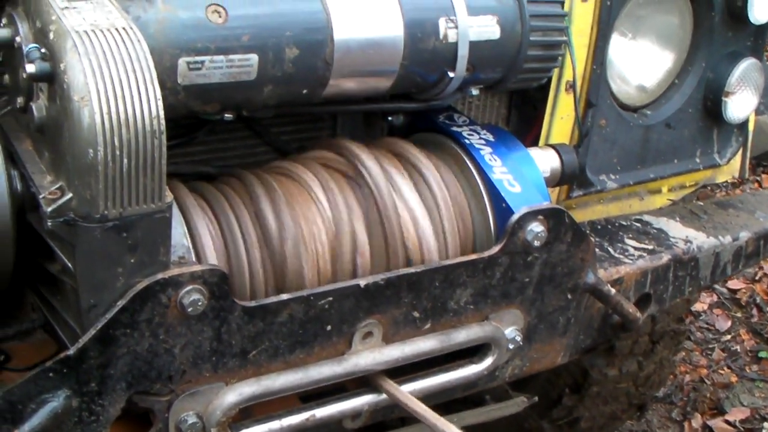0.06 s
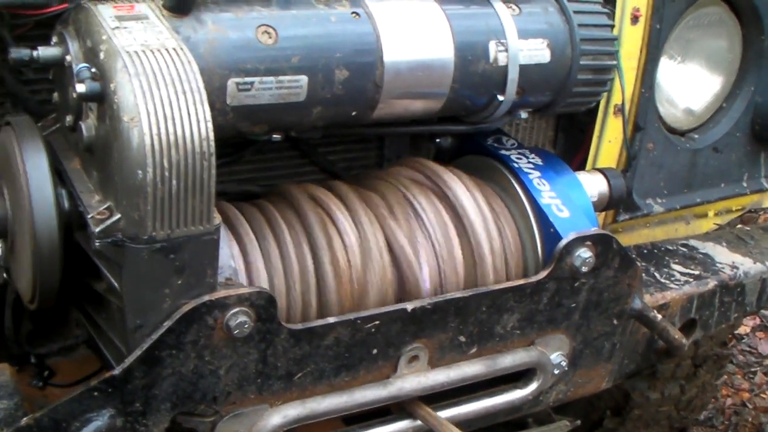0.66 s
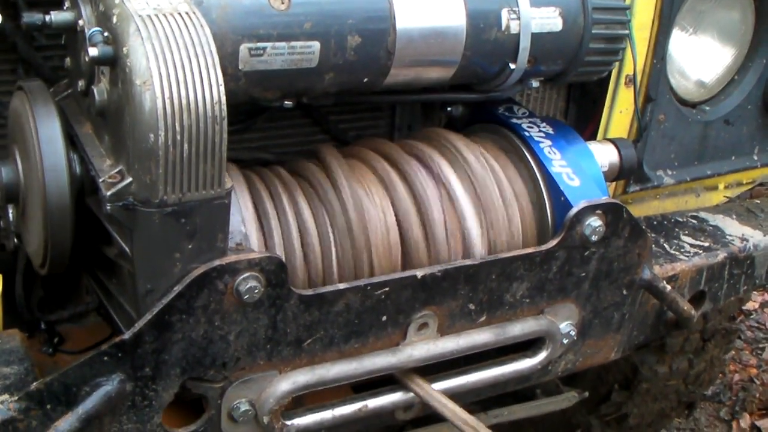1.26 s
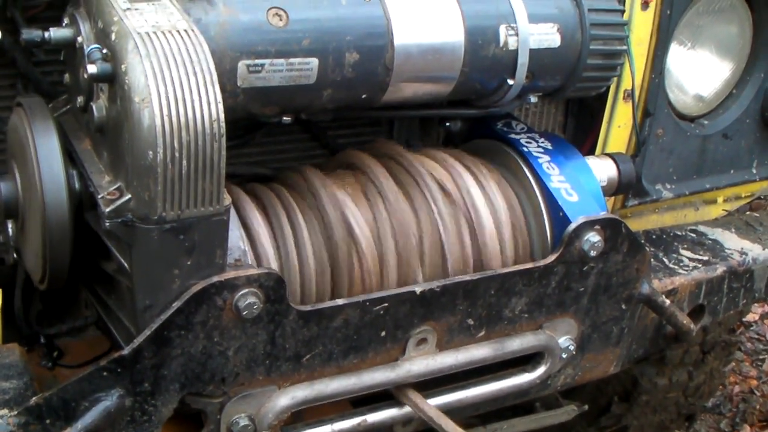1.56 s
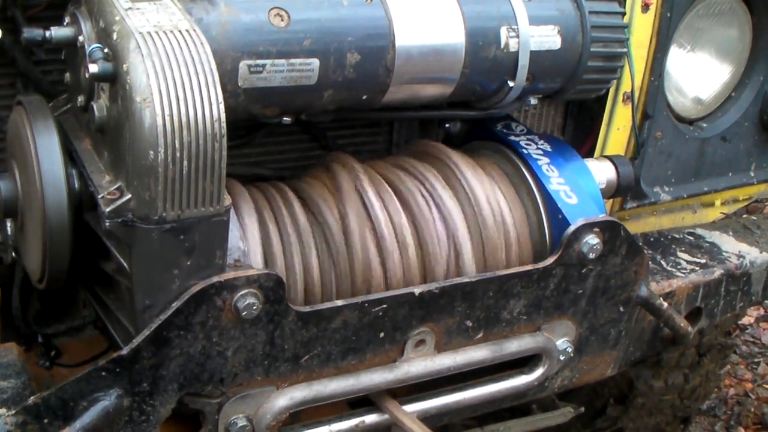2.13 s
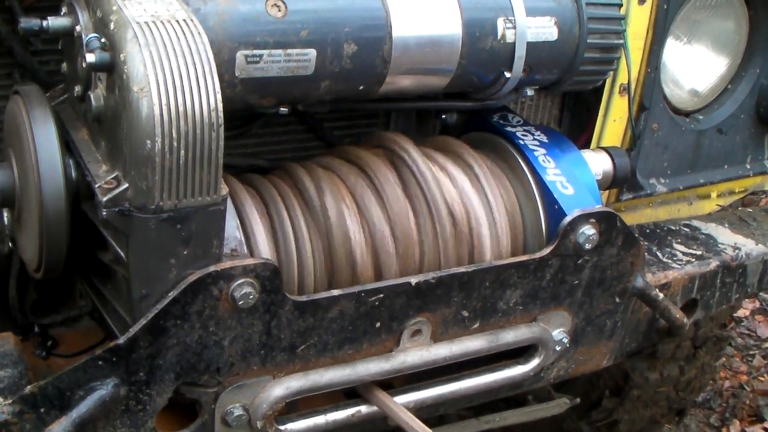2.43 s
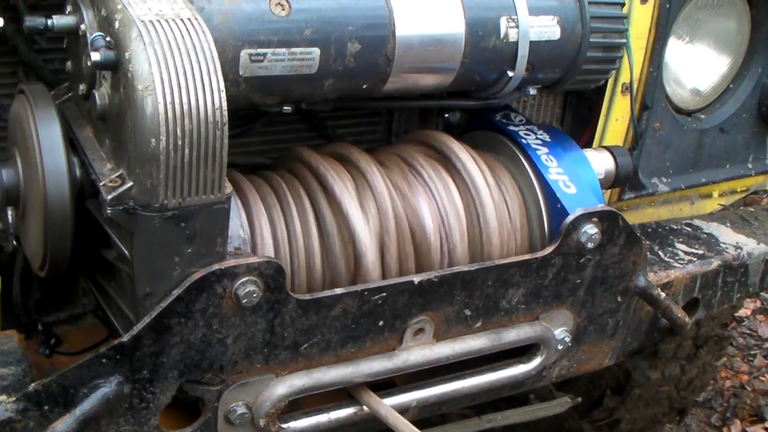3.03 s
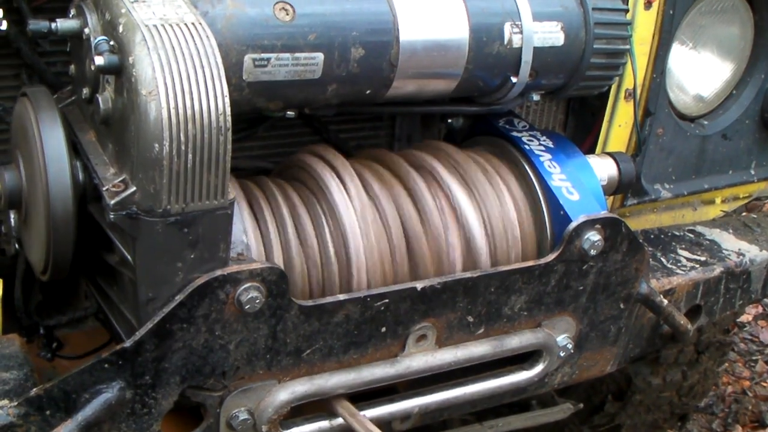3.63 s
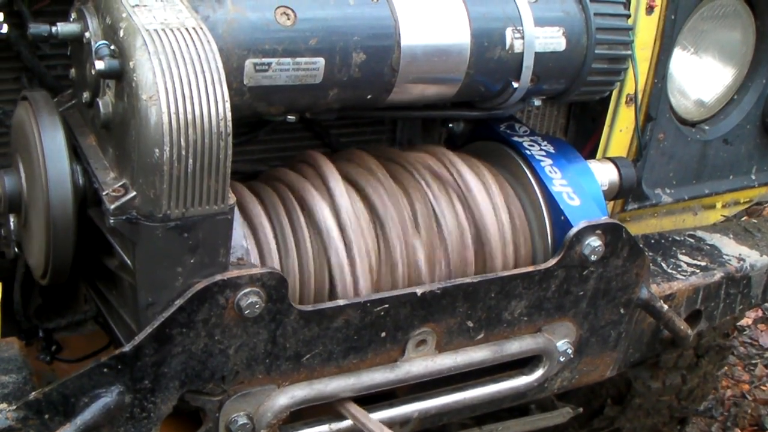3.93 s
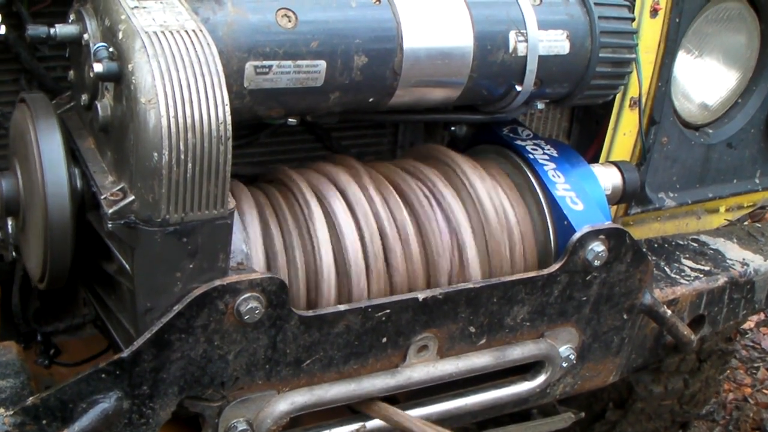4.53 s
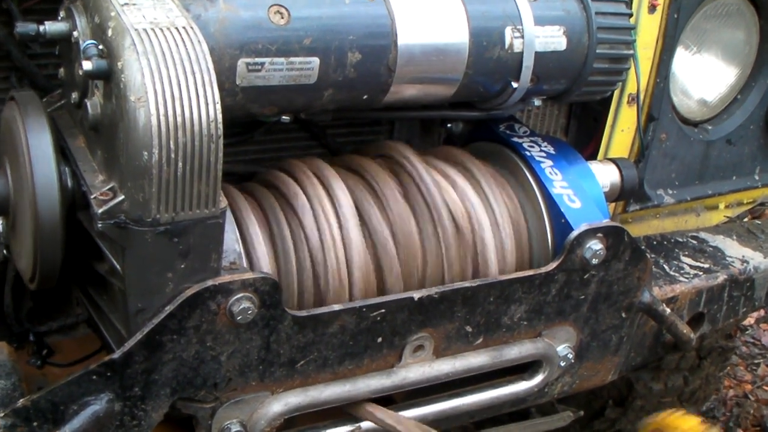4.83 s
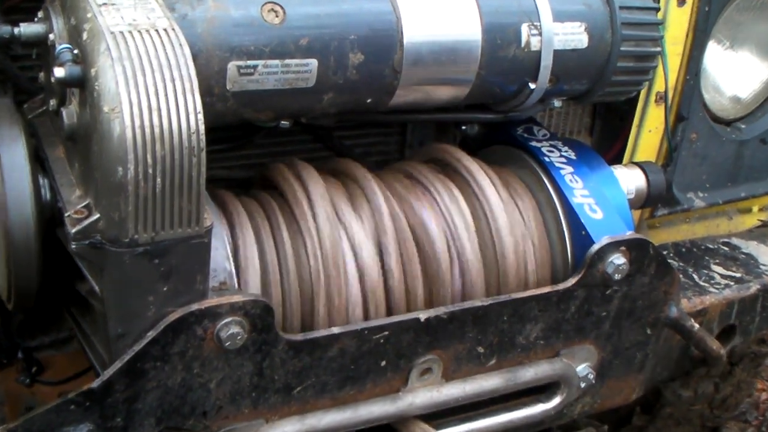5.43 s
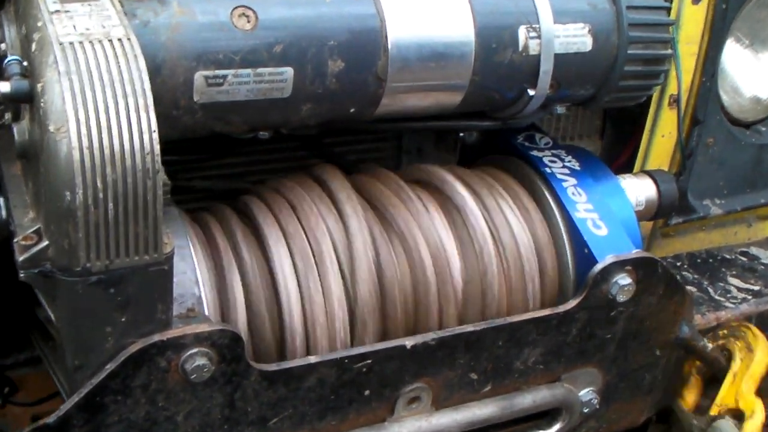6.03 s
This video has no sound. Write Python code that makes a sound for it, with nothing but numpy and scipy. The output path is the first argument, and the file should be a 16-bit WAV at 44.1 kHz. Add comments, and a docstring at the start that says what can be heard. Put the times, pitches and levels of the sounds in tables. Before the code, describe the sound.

An electric winch runs right by the microphone, its motor humming and whining over gritty whirring gears and a high hiss. A steel ratchet rattles along in very fast, uneven, ringing ticks. After about five seconds the motor starts to run down, its pitch sinking and whine fading. A hook clanks briefly against the bumper while the ticking carries on, more even and a little slower.

```python
"""Electric winch, close up

A winch winds in rope right by the microphone, then slows as the hook comes up and knocks on the bumper.
The motor hums and whines at multiples of its shaft speed, the gears whirr and the brushes hiss. A steel
pawl bounces unevenly over its ratchet, some sixty ringing ticks a second, falling into step as it slows.
"""
import sys
import numpy as np
from scipy.fft import rfft, irfft, next_fast_len
from scipy.io import wavfile
from scipy.ndimage import map_coordinates

SR = 44100
rng = np.random.default_rng(int(sys.argv[2]) if len(sys.argv) > 2 else 0)


def to_wav(sig):
    """Store sig (one row per channel, or 1-D mono) as 16-bit WAV at the path in sys.argv[1].

    Samples outside -1..1 are clipped; the rate is SR.
    """
    pcm = np.clip(np.atleast_2d(sig), -1, 1) * 32767
    pcm = np.round(pcm).astype(np.int16)
    wavfile.write(sys.argv[1], SR, pcm.T)  # frames by channels


N = 276507


def ratchet(speed, ring_gain_db=2.2, snap_gain_db=1, detune=0.0039, left_lead_s=0.000013):
    """Each drop snaps the pawl's tip and sets its close modes swelling and dying."""
    # Modes of the steel pawl and of its tip. Each row: frequency in Hz, level in dB, t60 in seconds.
    pawl_modes = [(4464, -2.5, 0.0097), (4727.7, 6, 0.016), (4796.4, 4.5, 0.023), (6460, -4, 0.0084),
                  (8745, -10.5, 0.014), (9740, -13, 0.019)]
    tip_modes = [(6980, -2.5, 0.0095), (12560, 1.5, 0.0046), (13540, 2.5, 0.013), (14150, 1.5, 0.0044)]
    times, ring_db, snap_db = pawl_drops(speed).T
    t = np.arange(SR // 40) / SR
    seat = 1 + detune * rng.standard_normal((len(times), 1))  # how the pawl sits shifts all its modes
    out = np.zeros((2, N))
    for k, (hz, db, t60) in enumerate(pawl_modes):
        size = (-1) ** k * amp(ring_db + ring_gain_db + db)[:, None]  # neighbours start in opposition
        out += placed(times, size * amp(-60 * t / t60) * np.sin(2 * np.pi * hz * seat * t))
    attack = 1 - np.exp(-t / 0.00021)
    for hz, db, t60 in tip_modes:  # the tip lands a little differently every time
        strength, phase, stray = rng.standard_normal((3, len(times), 1))
        envelope = attack * amp(snap_db[:, None] + snap_gain_db + db + 0.76 * strength - 60 * t / t60)
        tip_hz = hz * (1 + 0.012 * stray)
        for channel, lead in enumerate([left_lead_s, 0]):  # the left microphone is nearer
            snap = envelope * np.sin(2 * np.pi * tip_hz * (t + lead) + 1.36 * phase)
            out[channel] += placed(times, snap)
    return out * amp([[.25], [-.25]])


def pawl_drops(speed, teeth_per_turn=0.8054, ring_spread_db=3.0, snap_spread_db=4.0, calm=0.43):
    """Hard drops with lighter bounces between them, as rows of seconds, ring dB and snap dB."""
    # The pawl's hardest drops. Each row: time in seconds, ring in dB, snap in dB.
    hard_drops = np.array([(0.0069, -13.0, -16), (0.149, -9, -14), (0.276, -12.0, -16), (0.4035, -10, -16),
                           (0.4776, -16, -11.0), (0.5527, -10.0, -14.0), (0.5745, -11.5, -11),
                           (0.7475, -10.5, -13), (0.83, -10, -13), (0.9025, -13, -14),
                           (0.9492, -11.5, -14.0), (1.0374, -12.5, -10.0), (1.144, -12, -14),
                           (1.2027, -13.0, -10.0), (1.284, -15, -9), (1.3453, -9.5, -12.0),
                           (1.3894, -12.5, -12), (1.5097, -10.0, -13.0), (1.585, -11.0, -12),
                           (1.6877, -14.5, -7.5), (1.7485, -11.5, -12), (1.8692, -10.5, -15),
                           (1.996, -12.0, -12.0), (2.1382, -13.0, -13), (2.2648, -13.0, -11),
                           (2.3455, -15.0, -9), (2.4648, -16, -10), (2.5111, -9.5, -16.0),
                           (2.6973, -11.5, -12), (2.854, -10.0, -12), (2.8751, -16, -9),
                           (2.9445, -12.0, -12.0), (3.0779, -11.0, -9), (3.1896, -10.5, -12.0),
                           (3.2626, -16, -12), (3.4186, -14.5, -11), (3.5009, -21, -7),
                           (3.5908, -16.0, -10), (3.7539, -23, -8), (3.8358, -19, -7), (3.986, -18, -11),
                           (4.1341, -18, -12), (4.2079, -11, -13), (4.3492, -19, -8.5), (4.4543, -15, -12),
                           (4.5439, -17, -10.0), (4.6102, -19, -11), (4.7982, -12.5, -15),
                           (4.8587, -10.0, -22.0), (4.9631, -9, -15.0), (5.0897, -14, -14),
                           (5.2286, -11, -12), (5.3229, -11, -11), (5.419, -11, -15), (5.5159, -15, -10.5),
                           (5.8049, -17, -9.0), (5.9458, -12, -15), (6.1112, -13, -13.0),
                           (6.2638, -12.5, -13)])
    # How a bounce sounds. Each row: landing place on the tooth from 0 to 1, ring in dB, snap in dB.
    tooth_sound = [(.1, -15, -11.5), (.3, -13.8, -13.5), (.42, -13.6, -17), (.52, -14.8, -15.5),
                   (.6, -16.8, -16.5), (.7, -17, -14.5), (.9, -18.5, -18.5)]
    t = np.arange(N) / SR
    teeth = 0.45 + teeth_per_turn * np.cumsum(speed) / SR  # the pawl starts partway along a tooth
    throw = (speed / speed[0]) ** 10  # a slower ratchet throws the pawl far less
    hard_teeth = np.interp(hard_drops[:, 0], t, teeth)
    landed = np.concatenate([bounces(start, stop, np.interp(start, teeth, throw))
                             for start, stop in zip(hard_teeth, hard_teeth[1:])])
    place, ring_db, snap_db = np.transpose(tooth_sound)
    wildness = calm + (1 - calm) * np.interp(landed, teeth, throw)  # a settled pawl ticks more evenly
    chance = rng.uniform(-1, 1, (len(landed), 2)) * wildness[:, None]
    light_drops = np.c_[np.interp(landed, teeth, t),
                        np.interp(landed, place, ring_db, period=1) + ring_spread_db * chance[:, 0],
                        np.interp(landed, place, snap_db, period=1) + snap_spread_db * chance[:, 1]]
    return np.vstack([hard_drops, light_drops])


def bounces(start, stop, throw, settled_teeth=2, tries=60, hops=28):
    """Landings, in teeth, between two hard drops: the chance run that comes nearest the second."""
    # How a tooth throws the pawl. Each row: landing place from 0 to 1, flight in teeth at full throw.
    flights = [(.1, 2.57), (.3, 2.48), (.37, 2.83), (.42, 2.35), (.52, 1.85), (.6, 1.73), (.9, 1.68)]
    place, flight = np.transpose(flights)
    runs = [np.full(tries, start)]
    for chance in rng.standard_normal((hops, tries)):
        kick = np.interp(runs[-1], place, flight, period=1) - settled_teeth + .025 * chance
        runs.append(runs[-1] + settled_teeth + throw * kick)
    runs = np.array(runs)
    last, nearest = np.unravel_index(np.argmin(np.abs(runs - stop)), runs.shape)
    return runs[1:last, nearest]


def motor(speed, angle, commutator_bars=42):
    """Shaft tones, magnetic hum at twice the shaft speed and commutator whine, locked to the shaft."""
    # Hum and whine, both sinking as the motor runs down. Each row: time in seconds, level in dB.
    hum_levels = [(0, -33), (1.6, -32), (4.9, -32), (5.28, -34.5), (5.37, -48), (5.5, -44)]
    whine_levels = [(0, -30), (1, -30.5), (1.6, -31), (1.9, -26), (2.4, -28), (3, -27.5), (3.6, -29),
                    (4.1, -26), (4.5, -28), (4.65, -29), (4.9, -31), (5.15, -38), (6.27, -52)]
    # How well the casing radiates the hum. Each row: frequency in Hz, gain in dB.
    casing = [(280, -38), (305, -0.5)]
    sides = np.array([[-1], [1]])  # left and right microphones
    tight, ripple_db = drum(angle)
    tones = shaft_tones(speed, angle, sides)
    hum_db = curve(hum_levels) + along(casing, 2 * speed) - 1 - 4 * tight + 0.76 * ripple_db
    hum_gain = amp(hum_db + 1.93 * wobble(22))
    hum = hum_gain * np.sin(2 * angle + 0.15 * wobble(30) + 0.047 * sides * wobble(70))
    whine_gain = amp(curve(whine_levels) + 1.3 * wobble(25))
    whine = whine_gain * np.sin(commutator_bars * angle + 0.71 * sides + 0.07 * wobble(50))
    return np.sqrt(2) * (tones + hum + whine)


def shaft_tones(speed, angle, sides, fade_db_per_octave=27, flutter_db=4.0, right_lead_rad=0.0042):
    """The shaft's unbalance sounds once a turn, with overtones that fade as the motor slows."""
    # Low tones, each swelling as it slides through a panel resonance. Each row: multiple of the speed,
    # level in dB, change at the drum's tight spot in dB, resonance in Hz, width in Hz, gain in dB.
    low_tones = [(3, -49.5, 2.5, 388, 17, 14), (4, -61.5, 5, 622, 31.4, 31), (5, -50.5, -2, 770, 28, 13),
                 (6, -49, 9.5, 967, 32, 3.5), (8, -58.5, 0, 960, 30, 24)]
    # Faint higher tones. Each row: multiple of the speed, level in dB.
    high_tones = [(7, -52), (11, -50.5), (14, -52.5), (15, -48.5), (17, -47), (19, -49.5), (20, -47),
                  (21, -44), (23, -47), (24, -44), (35, -44)]
    tight, ripple_db = drum(angle)
    pace = speed / speed[0]
    unbalance = pace * amp(-47.5 + 1.45 * wobble(13))
    tones = unbalance * np.sin(angle + 0.16 * wobble(36) + 0.091 * sides * wobble(40))
    slowing_db = fade_db_per_octave * np.log2(pace)
    for order, db, tight_db, centre_hz, width_hz, peak_db in low_tones:
        panel_db = peak_db * np.exp(-((order * speed - centre_hz) / width_hz) ** 2)
        drum_db = tight_db * tight * amp(slowing_db) + 2 * ripple_db
        gain = amp(db + slowing_db + drum_db + panel_db + 2.6 * wobble(25))
        tones += gain * np.sin(order * angle + 0.55 * wobble(45))
    effort = pace ** 3.1
    for order, db in high_tones:  # play in the gears makes each of them flutter
        phase = order * (angle + right_lead_rad * sides) + 0.5 * wobble(45)
        tones += effort * amp(db + flutter_db * wobble(20)) * np.sin(phase)
    return tones


def drum(angle, gearing=134, tight_at_turns=0.38, tight_width_turns=0.14):
    """The drum binds once a turn and its gears ripple: tightness from 0 to 1, and ripple in dB."""
    # Gear train ripple. Each row: cycles per drum turn, first crest in drum turns, depth in dB.
    ripples = [(3, 0.23, 0.36), (6, 0.13, .5)]
    turns = angle / (2 * np.pi * gearing)
    from_tight = (turns - tight_at_turns + .5) % 1 - .5
    tight = np.exp(-(from_tight / tight_width_turns) ** 2)
    ripple_db = sum(db * np.cos(2 * np.pi * cycles * (turns - crest)) for cycles, crest, db in ripples)
    return tight, ripple_db


def gears_and_brushes(angle, grit_db=1.88, surge_db=0.83):
    """Gear teeth and brushes rub in gritty bursts, louder under load."""
    # The rope's pull on the drive. Each row: time in seconds, dB about the usual pull.
    rope_pull = [(0.0, -1.5), (0.4, -0.7), (0.6, -1.6), (0.7, 1.3), (0.95, -1.5), (1.25, 0.2), (1.55, -1.5),
                 (1.85, 1.0), (2.64, -0.5), (2.89, -1.3), (3.04, 1.5), (3.09, -0.6), (3.64, -1.5),
                 (3.69, 1.7), (3.94, -3), (3.99, 2), (4.54, -0.6), (4.64, -3.5), (4.74, 4), (5.09, -0.8),
                 (5.14, 1.5), (5.49, 0.6), (5.54, -2.5), (5.79, -1.1), (6.04, -3.5), (6.27, -2.5)]
    # Colours of the running noise. Each row: frequency in Hz, relative density in dB.
    rumble_colour = [(20, -45), (36, -57), (60, -12), (100, -27), (150, -7), (240, -20.5), (300, -5),
                     (360, 1.5), (480, -4), (750, 1), (1050, 1), (1400, -3), (1900, -27), (3000, -60)]
    whirr_colour = [(700, -50), (1300, -9.5), (1800, -2), (2600, -3.5), (3400, -1.5), (4100, -1),
                    (4700, -1), (5300, -3.5), (6200, -27), (8000, -60)]
    hiss_colour = [(4000, -42), (5300, -8.5), (6000, -2.5), (6750, -1), (7020, 6.5), (7300, -2),
                   (7650, -12), (8100, -19), (8400, -4.5), (9700, -8), (10600, -14), (12300, -9.5),
                   (14200, -5), (15800, -23.5)]
    _, ripple_db = drum(angle)
    load_db = curve(rope_pull) + ripple_db + 0.55 * wobble(16)
    friction = amp(grit_db * wobble(600) + surge_db * wobble(40))
    rumble = amp(-33.5 + 0.77 * load_db) * housing_noise(rumble_colour, friction)
    whirr = amp(-26 + load_db) * housing_noise(whirr_colour, friction)
    hiss = amp(-22.5 + load_db) * housing_noise(hiss_colour, friction)
    return rumble + whirr + hiss


def hook():
    """The hook clanks against the bumper, rings and jolts the frame."""
    # Each row is a knock: start in seconds, clank in dB, its t60 in seconds, ring in dB, thump in dB.
    knocks = [(5.583, -13.5, .14, -34, -42), (5.607, -36, .05, -30, -39), (5.621, -20.5, 0.14, -23, -30),
              (5.64, -26, 0.05, -26.5, -35), (5.658, -42, .04, -39, -52)]
    # Modes of the hook and bumper steel, then of the frame.
    # Each row: frequency in Hz, level in dB, t60 in seconds.
    steel_modes = [(633, -6, 0.3), (709, -2, 0.13), (783, -2, .14), (912, -3, 0.16), (1060, -5, 0.16),
                   (1744, -0.5, 0.11), (3030, -4.5, 0.16), (3282, -4, .12), (3380, 4.5, 0.09),
                   (5970, -12, 0.1), (6500, -8, 0.089)]
    frame_modes = [(45, -9, .07), (82, -12, 0.058), (128, 2.5, 0.11), (200, -5.5, 0.082), (390, 3, .05)]
    # Colour of the clank. Each row: frequency in Hz, relative density in dB.
    clank_colour = [(200, -23), (500, -4.5), (1800, 3), (2700, 3), (3400, 2.5), (5200, 6), (6300, 12.5),
                    (7200, -6), (8100, 0), (9000, 7), (15000, -50)]
    clank = housing_noise(clank_colour)
    t = np.arange(SR // 3) / SR
    thump = sum(amp(db - 60 * t / t60) * np.sin(2 * np.pi * hz * t) for hz, db, t60 in frame_modes)
    crack = 1.05 * amp(-60 * t / 0.039)
    out = np.zeros((2, N))
    for start, clank_db, clank_t60, ring_db, thump_db in knocks:
        ring = np.zeros(len(t))
        for hz, db, t60 in steel_modes:
            decay = amp(db + rng.normal(0, 2.1) - 60 * t / t60)
            ring += decay * np.sin(2 * np.pi * (hz * t + rng.random()))
        envelope = amp(clank_db) * (amp(-60 * t / clank_t60) + crack)
        body = amp(ring_db) * ring + amp(thump_db) * thump
        out += clank * placed([start], envelope[None]) + placed([start], body[None])
    return out


def whistle(hz=12178, db=-48):
    """A thin steady whistle, barely above the hiss."""
    phase = 2 * np.pi * hz * np.arange(N) / SR + np.array([[.7], [-.7]]) + .4 * wobble(33)
    return amp(db) * np.sqrt(2) * np.sin(phase)


def housing_noise(spectrum, drive=1):
    """Stereo noise of rms 1, excited in step with drive and coloured by spectrum and the housing."""
    # Housing resonances. Each row: centre in Hz, width in Hz, gain in dB.
    resonances = [(434, 20, 2.5), (580, 13, 8.5), (638.5, 6.2, 12.5), (942, 16, 4.5), (1070, 30, 4.5)]
    # Likeness at the two microphones. Each row: frequency in Hz, correlation from 0 to 1.
    likeness = [(30, 0.9), (80, 1), (300, 1), (1000, 0.92), (3000, 0.96), (4100, 0.45), (5500, 0.08),
                (7000, 0.49), (9000, 0.06), (15000, 0.1)]

    def colour(hz):
        """Mid and side gains at each frequency."""
        housing = 1 + sum((amp(db) - 1) / (1 + (2 * (hz - centre) / width) ** 2)
                          for centre, width, db in resonances)
        spread = np.arccos(along(likeness, hz)) / 2
        return amp(along(spectrum, hz)) * housing * np.array([np.cos(spread), np.sin(spread)])

    mid, side = filtered(rng.standard_normal((2, N)) * drive, colour)
    noise = np.array([mid + side, mid - side])
    return noise / np.sqrt(np.mean(noise ** 2))


def amp(db):
    """Decibels to gain."""
    return 10 ** (np.asarray(db) / 20)


def along(points, hz):
    """Rows of Hz and value, read on a log frequency axis."""
    freqs, values = np.transpose(points)
    return np.interp(np.log(hz + 1), np.log(freqs + 1), values)


def curve(points):
    """Rows of seconds and value, joined into one value per sample."""
    times, values = np.transpose(points)
    return np.interp(np.arange(N) / SR, times, values)


def wobble(rate):
    """A smooth random curve, rate knots a second."""
    return map_coordinates(rng.standard_normal(int(N * rate / SR) + 4), [np.arange(N) * rate / SR])


def filtered(x, response):
    """x shaped by a gain that depends on frequency."""
    size = next_fast_len(N + SR // 4)
    return irfft(rfft(x, size) * response(np.fft.rfftfreq(size, 1 / SR)), size)[..., :N]


def placed(times, sounds):
    """The sum of short sounds, one a row, each starting at its time in seconds."""
    at = np.round(np.abs(times) * SR).astype(int)[:, None] + np.arange(sounds.shape[1])
    return np.bincount(at.ravel(), sounds.ravel(), N)[:N]


def scene():
    """One shaft drives the motor tones, the gears and the ratchet, close by and just left of centre."""
    # Motor speed. Each row: time in seconds, turns a second.
    shaft_speed = [(0, 166), (1.9, 166.1), (2.9, 166.4), (4.2, 167.3), (4.4, 166.9), (4.65, 165.8),
                   (5.05, 165.3), (5.3, 158.1), (5.55, 150.3), (5.8, 142.6), (6.27, 127.7)]
    speed = curve(shaft_speed)
    angle = 2 * np.pi * np.cumsum(speed) / SR
    winch = motor(speed, angle) + gears_and_brushes(angle) + whistle() + hook() + ratchet(speed)
    return winch * amp([[.17], [-.17]])


def record(dry, notch_hz=8050, top_hz=15850):
    """The microphone has a narrow notch; the camera keeps nothing above its band limit."""
    notch = lambda hz: amp(-17 * np.exp(-((hz - notch_hz) / 280) ** 2))
    return filtered(dry, lambda hz: notch(hz) * (hz < top_hz))


dry = scene()
out = record(dry)
to_wav(out)
```